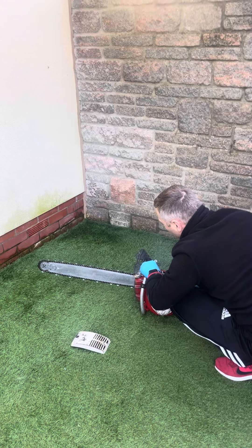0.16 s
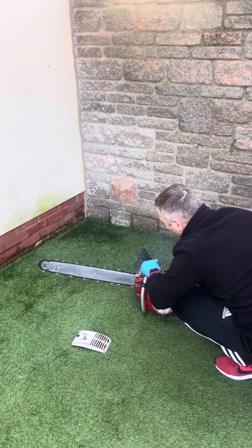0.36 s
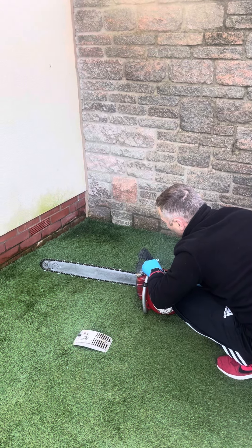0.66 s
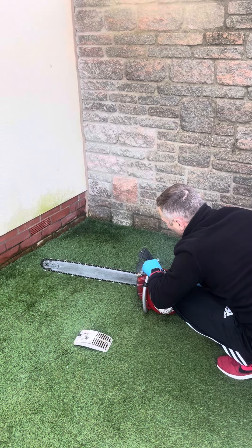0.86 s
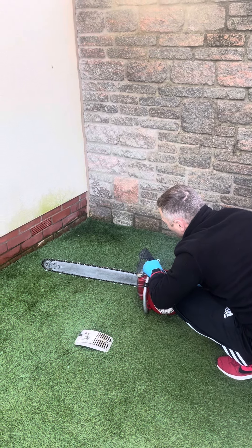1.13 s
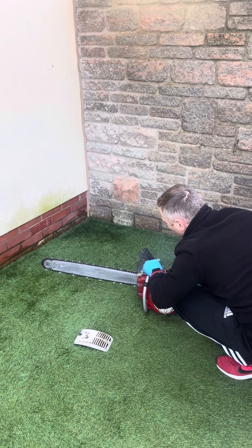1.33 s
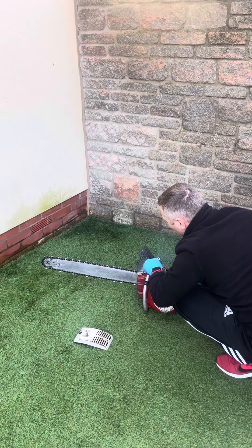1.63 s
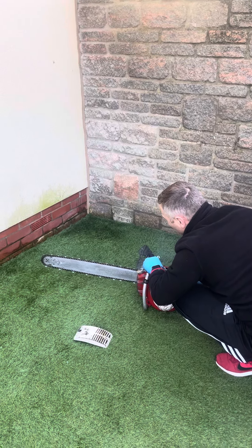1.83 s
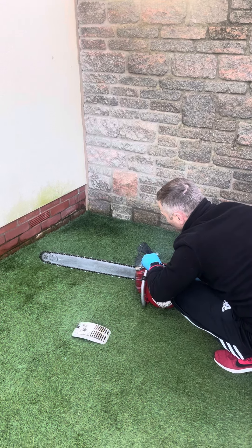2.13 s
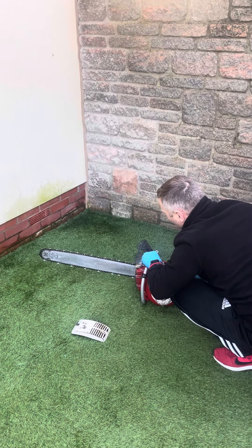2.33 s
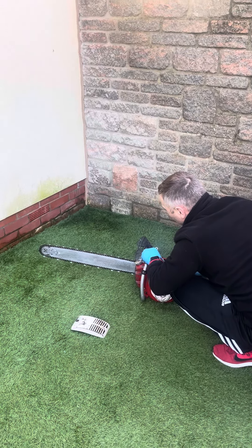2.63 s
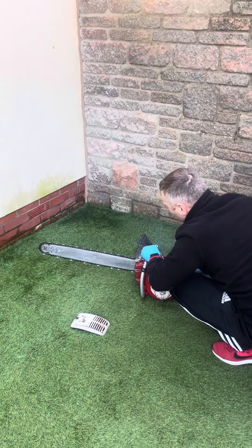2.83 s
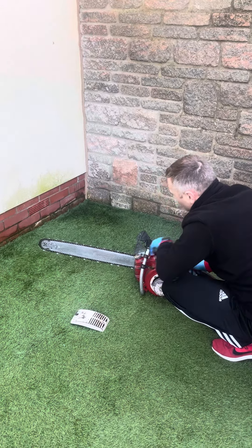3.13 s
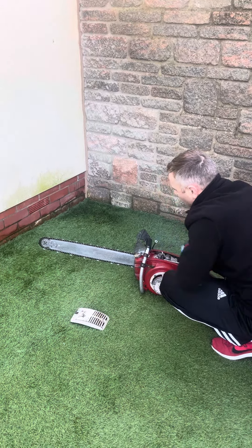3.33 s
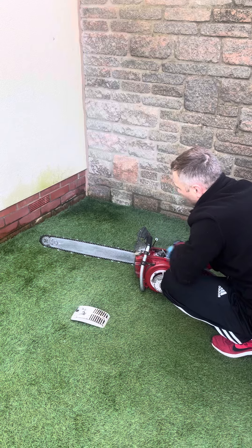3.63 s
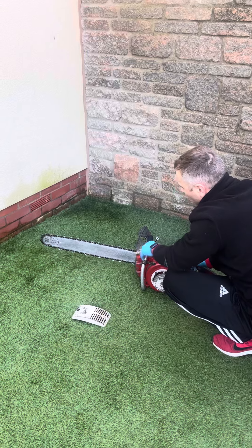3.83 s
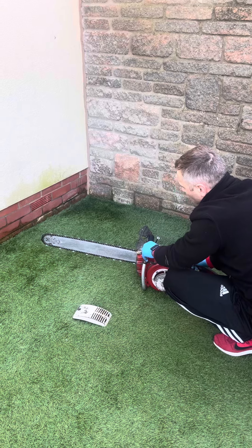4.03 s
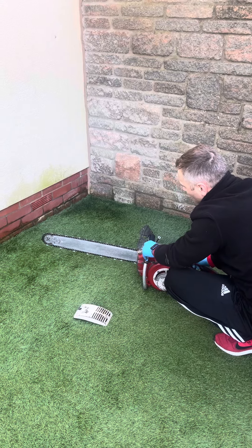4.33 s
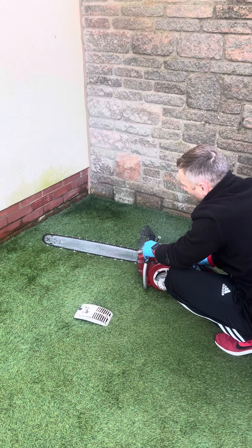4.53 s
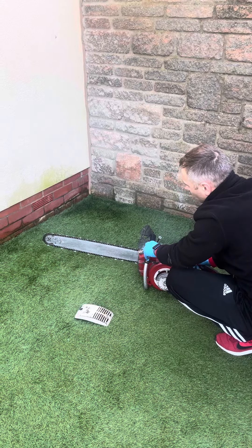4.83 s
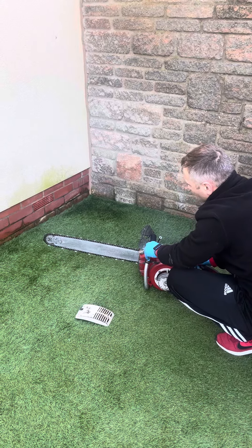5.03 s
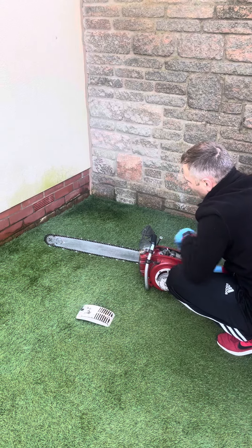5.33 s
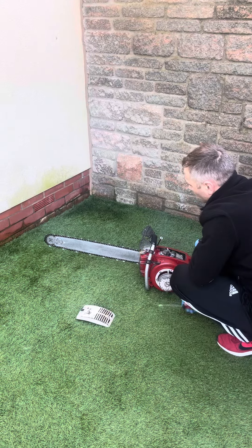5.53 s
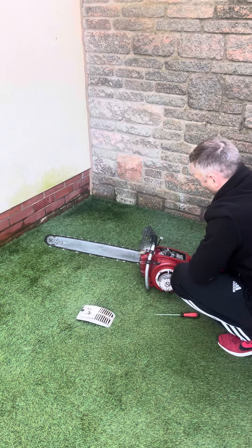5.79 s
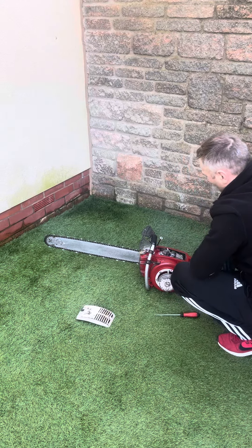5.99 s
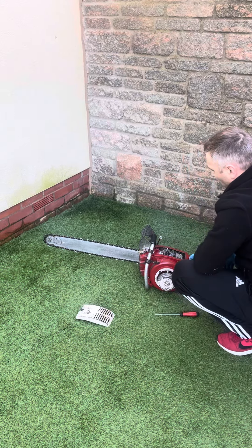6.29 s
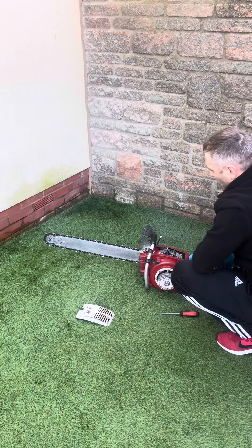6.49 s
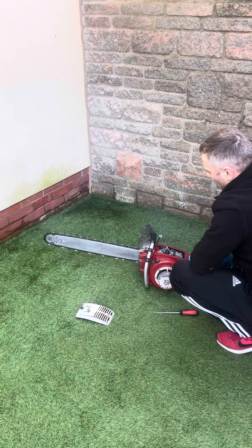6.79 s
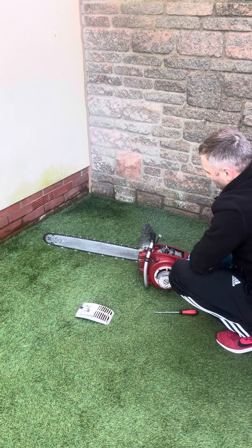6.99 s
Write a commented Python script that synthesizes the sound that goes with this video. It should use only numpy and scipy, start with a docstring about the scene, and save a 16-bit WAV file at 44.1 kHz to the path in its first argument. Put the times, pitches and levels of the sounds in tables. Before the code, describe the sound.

An old two-stroke chainsaw idles unevenly outdoors, ragged bangs popping over soft puffs and metallic rattle, then is switched off and coasts to a stop.

```python
"""Uneven bangs and soft puffs of an old two-stroke chainsaw idling on turf in a walled corner.
It fires only now and then, mostly every second to fourth turn, then is switched off and coasts to rest.
Bangs and puffs ring silencer modes, firings spit shaped gas noise, filtered gulps honk in the carburettor
and gritty noise rattles. Two phone microphones a hand apart hear it with the walls; a thin far whistle
sounds near the end, over faint yard air."""
import sys
import numpy as np
from scipy import signal
from scipy.fft import rfft, irfft, next_fast_len
from scipy.io import wavfile
from scipy.ndimage import uniform_filter1d

SR = 44100
rng = np.random.default_rng(int(sys.argv[2]) if len(sys.argv) > 2 else 0)


def store_wav(level_fs):
    """Save 16-bit WAV to argv[1]."""
    pcm = np.round(np.clip(np.atleast_2d(level_fs), -1, 1) * 32767)
    wavfile.write(sys.argv[1], SR, pcm.T.astype(np.int16))


N = 315315

# Yard air. Each row: frequency in Hz, relative level in dB per Hz.
YARD_AIR = [(30, -4), (200, -10), (700, -27.5), (1200, -31), (3300, -45), (8000, -61), (14000, -79)]
# Wall echoes that push the two ports opposite ways. Each row: delay in ms, level in dB.
WALL_ECHOES = [(3.1, -14.5), (9.6, -14), (16.5, -8.5)]
# Port phase, left against right. Each row: frequency in Hz, lead in radians.
PORT_PHASE = [(0, 0), (1290, -0.7), (2410, 1.9), (4050, 0.5), (6290, 3.5), (7670, 6.1), (10000, 9.2),
              (14500, 15.5), (16000, 16.)]
# Port balance, left against right. Each row: frequency in Hz, level difference in dB.
PORT_BALANCE = [(60, 0.0), (200, -1.0), (380, 0.0), (700, -0.5), (1290, 3.5), (2380, 0.0), (4400, -1.0),
                (8120, 0.0)]
# Piston knocking against compression as it stops. Each row: start in seconds, relative level in dB.
PISTON_KNOCKS = [(6.746, -30.5), (6.876, -36), (6.913, -34), (7.003, -38.5)]
# Faint low thuds as the piston rocks to rest. Each row: start in seconds, relative push in dB.
PISTON_ROCKS = [(6.918, -44), (6.958, -50), (7.04, -55)]
# Rattle of loose parts. Each row: frequency in Hz, relative level in dB per Hz.
RATTLE_COLOUR = [(700, 6.5), (1150, 2), (1550, -1.5), (2000, -5), (2400, -1.5), (2750, -6.5), (3600, -11),
                 (5000, -11), (8500, -17), (11500, -20.5), (13500, -33.5), (15500, -61)]
# Clutch shoe rings. Each row: frequency in Hz, nominal ring in ms, share of turns from 0 to 1,
# strongest level in dB against the rattle.
CLUTCH_RINGS = [(2460, 7, 0.52, -2), (3560, 6, .55, -8), (5200, 7, .3, -9), (8800, 8, .3, -15)]
# Carburettor throat resonances. Each row: frequency in Hz, width in Hz, relative level in dB.
INTAKE_THROAT = [(942.7, 98, 1), (1010.5, 52, 0), (538, 275, -1.5), (757, 14, -1.5), (487.8, 80, -1),
                 (210, 236, 0.5)]
# Inlet port snaps, opening then closing: level in dB against the gulp noise.
INLET_SNAP_DB = [31, 27]
# Firings. Each row: time in seconds, relative bang in dB, gas spit in dB against the bang,
# shell crack in dB against the bang.
FIRINGS = [(0.0008, -11.5, -30.5, -30), (0.0883, -12.5, -26, -43), (0.1238, -13.5, -32, -38),
           (0.1936, -3, -29, -27.5), (0.2913, -10.5, -30, -36), (0.3258, -10.5, -28.5, -29),
           (0.3931, -10, -29.5, -45), (0.4625, -3, -27.5, -33), (0.5633, -14.5, -29, -34),
           (0.6363, -8.5, -28, -27.5), (0.7089, -13, -30.7, -40), (0.7455, -11, -30, -30.9),
           (0.8215, -3.5, -29, -25), (0.9282, -2.5, -29.5, -24), (1.061, -2, -27, -26.5),
           (1.191, -5, -25.5, -33), (1.2925, -4, -26, -22), (1.3964, -5, -24, -32),
           (1.5045, -3, -28.1, -24.5), (1.607, -7, -26, -26), (1.6791, -8.5, -24.5, -36),
           (1.7524, -2.5, -29.5, -23.5), (1.8513, -9, -28, -33), (1.919, -5, -30, -23),
           (2.021, -4, -28, -23.5), (2.1228, -5, -27.5, -30), (2.192, -6.5, -25, -26),
           (2.2615, -2.7, -24, -34), (2.3595, -7, -30, -34), (2.4265, -7.5, -30, -45.5),
           (2.4956, -3.5, -30.5, -31), (2.5997, -2.5, -25, -25.5), (2.73, -4.5, -25.5, -30.5),
           (2.8306, -4, -25.5, -24), (2.9344, -3.5, -27.5, -28), (3.034, -4, -30.5, -25),
           (3.1344, -2.5, -27.5, -24), (3.233, -2, -29.5, -27), (3.3302, -6.5, -27.5, -24.5),
           (3.398, -5, -27, -28), (3.5028, -13, -28.5, -33), (3.575, -13.5, -32, -33),
           (3.6514, -7, -24.5, -26), (3.7304, -4, -28, -24.5), (3.868, -3, -28, -23.5),
           (3.9925, -3, -27.5, -26), (4.0878, -4, -28, -24.5), (4.1866, -1.5, -30, -23.5),
           (4.318, -1.5, -31.5, -24.5), (4.4446, -2.5, -25, -28.5), (4.5415, -3.5, -27.5, -25),
           (4.641, -5.5, -26.5, -23), (4.7108, -7, -27.5, -33), (4.7786, -10, -31.1, -29),
           (4.8481, -9.5, -27, -35), (4.9193, -3.5, -29, -24), (5.0229, -3, -29, -22.5),
           (5.1552, -5.5, -25.5, -28), (5.2247, -10, -31.5, -26), (5.2945, -5, -29, -27),
           (5.398, -5, -28.5, -26.5), (5.5041, -3.5, -27.5, -25.5), (5.6344, -2, -31.9, -23),
           (5.731, -7, -28.5, -30.3), (5.797, -2.5, -30.5, -25.5), (5.9253, -9, -26, -30),
           (5.9925, -5.5, -29.5, -21.5), (6.096, -3, -29.5, -25.5), (6.1932, -10, -32, -28),
           (6.2267, -6, -29, -25), (6.3284, -3, -28.5, -23), (6.429, -3, -28, -23.5)]
# Gas spit. Each row: frequency in Hz, relative level in dB per Hz.
GAS_COLOUR = [(3500, -60), (5000, -1), (8000, -2), (11000, 3.5), (13500, -3.5), (15500, -3)]
# Silencer shell crack. Each row: frequency in Hz, relative level in dB per Hz.
SHELL_COLOUR = [(800, 2.5), (1500, -3.5), (2100, -8), (3000, -11), (4500, -14), (6500, -20.5)]
# Silencer chambers. Each row: frequency in Hz, build-up in ms, ring in ms, arrival in ms, relative peak in dB.
SILENCER_MODES = [(251.5, 1.6, 13.3, 3.21, -16.3), (304.5, .82, 12.7, 2.49, -16.1),
                  (356.8, 9, 8.14, 2.07, -12.2), (437, 1.6, 26, 1.86, -27.6), (529, 8.9, 9.6, 3.06, -25.4),
                  (592.6, .54, 9.6, 3.71, -11.2), (604, 5.9, 6.5, .69, -12), (780, .35, 12, 1.83, -19.7),
                  (929.8, 9, 4, .14, -15.5), (1002.8, .35, 12.1, 3.91, -21.9), (1231, 8.2, 4.3, .63, -27),
                  (1530, 7, 3.5, 1.2, -29), (1850, 5, 2.5, 1.15, -33), (2240, 5, 2.5, 1.15, -34),
                  (2910, 5, 2.5, 3.5, -30), (3270, 5, 2.5, 2.5, -36), (1105, 5, 5, 1.5, -29),
                  (722, 5, 7, 2, -33)]
# Crankcase breathing into the corner. Each row: frequency in Hz, build-up in ms, ring in ms, arrival in ms,
# relative peak in dB for a bang, relative peak in dB for a puff.
CASE_MODES = [(57.4, 11, 4.3, 8.7, 5.5, 1.5), (84.2, 36, 9.9, 6.85, 1.5, 0),
              (145.2, 12.8, 12.5, 1.3, -9, 6.5), (171, 29, 2.75, 0.66, 5, 4.5)]

YARD_DB = -59.5
WHISTLE_HZ, WHISTLE_S, WHISTLE_EDGE_S = 3540, 6.85, 0.013
WHISTLE_DB, WHISTLE_FADE_DB_PER_S = -56.5, 42
TOP_HZ = 15700  # top of the microphone's range
SPREAD_DB = -5  # share of jet and rattle that each port hears on its own

TURN_S = .0345  # typical idle turn
PORT_OPENS_S = 0.002484  # the exhaust port opens this long before the bang is heard to rise
# without spark, friction slows the crank at a steady rate
COAST_S, COAST_TURNS_PER_S, SLOWING_TURNS_PER_S2 = 6.5538, 29.6, 49.5
COAST_PUFF_DB, COAST_FADE_DB_PER_TURN = -12, 0.93
COAST_THUMP_DB, COAST_THUMP_DB_PER_TURN = -4.5, -0.2
COAST_DEEP_DB, COAST_DEEP_HZ, COAST_DEEP_LATE_S = -41.5, 100, 0.0039  # slow turns add a deep push

RATTLE_DB, INTAKE_DB = -37.5, -32  # at idle
RATTLE_DB_PER_HALVING, INTAKE_DB_PER_HALVING = 10, 10.5  # drop each time the crank speed halves
CLUSTER_DB, CLUSTERS_PER_S = 2.5, 25  # the rattle swells in clusters, each band on its own

PUFF_DB, PUFF_SOFT_HZ, PUFF_SCATTER_DB = -13, 1060, 1.7
PUFF_BARK_HZ, PUFF_BARK_DB = 538, -21  # puffs carry extra bark around here
PUFF_HOLLOW_HZ, PUFF_HOLLOW = 352, 0.27  # and ring the main chamber less, by this share
THUMP_DB, PUFF_THUMP_DB, PUFF_THUMP_ABOVE_HZ = -30.5, -33, 153
COLOUR_SCATTER_DB, COLOUR_ABOVE_HZ = 3.5, 1050  # upper chambers ring differently at each bang, mostly less


def undb(db):
    """Amplitude factor for a level in dB."""
    return 10 ** (np.asarray(db) / 20)


def level(x, db):
    """Scales x to an RMS level in dB."""
    return x * undb(db) / np.sqrt(np.mean(x ** 2))


def shape(x, gain):
    """Multiplies the spectrum by gain(Hz)."""
    size = next_fast_len(N)
    hz = np.arange(size // 2 + 1) * SR / size + 1  # 1 Hz up, to avoid dividing by zero
    return irfft(rfft(x, size) * gain(hz), size)[..., :N]


def colour(x, rows):
    """Shapes the spectrum along table rows of Hz and dB."""
    hz, db = np.transpose(rows)
    return shape(x, lambda f: undb(np.interp(np.log(f), np.log(hz), db, left=-80)))


def through(x, response):
    """Convolves x with a response."""
    return signal.fftconvolve(x, response)[:N]


def pulses(s, db):
    """One single-sample click per event."""
    out = np.zeros(N)
    places = np.clip((np.asarray(s) * SR).astype(int), 0, N - 1)
    np.add.at(out, places, undb(db))
    return out


def chambers(modes):
    """Response of coupled chambers: each mode builds up, then rings away."""
    out = 0
    for k, (hz, rise_ms, ring_ms, late_ms, db) in enumerate(modes):
        ms = np.maximum(np.arange(SR // 5) * 1000 / SR - late_ms, 0)
        swell = (1 - np.exp(-ms / rise_ms)) ** 2 * np.exp(-ms / ring_ms)
        tone = np.sin(2 * np.pi * hz * ms / 1000)
        out = out + (-1) ** k * undb(db) * swell / swell.max() * tone  # neighbours in opposite sign
    return out


def grit(spread_db):
    """Noise made of tiny knocks of very uneven size."""
    unevenness = uniform_filter1d(rng.exponential(size=N), size=24)
    return rng.standard_normal(N) * undb(spread_db * unevenness)


def wandering(rate):
    """Random levels, one every 1 / rate s, slewed from each to the next."""
    k = int(SR / rate)
    steps = np.repeat(rng.standard_normal(N // k + 1), k)
    return 0.9 * uniform_filter1d(steps, k)[:N]


def yard_air():
    """Quiet air of the yard: steady noise, strongest in the bass."""
    return level(colour(rng.standard_normal(N), YARD_AIR), YARD_DB)


def whistle():
    """A thin far tone of steady pitch that starts quickly and fades."""
    t = np.arange(N) / SR
    edge = np.clip((t - WHISTLE_S) / WHISTLE_EDGE_S, 0, 1)
    fade_db = WHISTLE_DB - WHISTLE_FADE_DB_PER_S * (t - WHISTLE_S)
    return np.sqrt(2) * edge * undb(fade_db) * np.sin(2 * np.pi * WHISTLE_HZ * t)


def walls(x, wet_db, t60_s=0.084, top_hz=3540.0):
    """Diffuse return from the stone walls, unlike at the two ports; the open yard lets the bass escape."""
    t = np.arange(SR // 2) / SR
    decay = np.exp(-np.log(1000) * t / t60_s) * (t > .004)
    tails = rng.standard_normal((2, len(t))) * decay
    wet = np.array([through(x, tail / np.sqrt(np.sum(tail ** 2))) for tail in tails])

    def wall_gain(f):
        soft_top = undb(wet_db) / (1 + 1j * f / top_hz) ** 2
        return soft_top * (0.0087 + 1 / (1 + 150.0 / (1j * f)) ** 2)
    return shape(wet, wall_gain)


def wall_echoes(x):
    """Separate wall returns of x, thinned in bass and treble."""
    ms, db = np.transpose(WALL_ECHOES)
    returns = through(x, pulses(ms / 1000, db)[:SR // 20])
    return shape(returns, lambda f: 1 / (1 + 1270.0 / (1j * f)) / (1 + 1j * f / 2100.0))


def coast():
    """Times and puff levels of the last eight turns, each longer than the one before."""
    turn = np.arange(8)
    speed = np.sqrt(np.maximum(COAST_TURNS_PER_S ** 2 - 2 * SLOWING_TURNS_PER_S2 * turn, 0))
    times = COAST_S + (COAST_TURNS_PER_S - speed) / SLOWING_TURNS_PER_S2
    return times, COAST_PUFF_DB - COAST_FADE_DB_PER_TURN * turn


def halvings():
    """How many times the crank speed has halved since the coast began."""
    lost = SLOWING_TURNS_PER_S2 * (np.arange(N) / SR - COAST_S) / COAST_TURNS_PER_S
    return -np.log2(np.clip(1 - lost, .03, 1))


def crank():
    """Times of unfired idle turns, the puff strength left by the last firing, and times of all turns."""
    s, db = np.transpose(list(FIRINGS) + [(COAST_S, 0, 0, 0)])[:2]
    idle, after_db = [], []
    for start, gap, bang_db in zip(s, np.diff(s), db):
        turns = max(round(gap / TURN_S), 1)
        u = np.arange(1, turns) / turns
        # the bang speeds the crank up, so early turns are the shortest
        idle += list(start + gap * (u - 0.094 * u * (1 - u)))
        # leftover burnt gas makes the first puff after a bang the strongest
        first_db = 2.8 * (u < 1.5 / turns)
        after_db += list(0.39 * bang_db + first_db - 0.37 * np.arange(turns - 1))
    turns = np.sort(np.r_[s[:-1], idle, coast()[0], 7.0])
    return np.array(idle), np.array(after_db), turns


def piston_knocks():
    """Dull metal knocks with a short rasp."""
    s, db = np.transpose(PISTON_KNOCKS)
    u = np.arange(SR // 10) / SR / 0.0048
    rasp = through(pulses(s - .002, db), u * np.exp(1 - u)) * rng.standard_normal(N)
    dull = [(300, 2.5), (1500, 5.0), (4000, -3.0), (9000, -14), (15000, -26)]  # Hz, dB
    return colour(rasp, dull) * undb(1.0)


def rattle_fade():
    """Rattle gain, falling as the crank slows."""
    return undb(RATTLE_DB - RATTLE_DB_PER_HALVING * halvings())


def rattle(turns, phase):
    """Loose parts chatter twice a turn in uneven clusters, and clutch shoes ring briefly."""
    beat = 1 + 0.067 * np.cos(4 * np.pi * (phase - .2))
    chatter = level(colour(grit(8.4) * beat, RATTLE_COLOUR), 0)
    clustered = 0
    for k in range(11):  # overlapping bands, half an octave apart
        band = shape(chatter, lambda f: np.clip(1 - abs(np.log2(f / 496.0) * 2 - k), 0, 1))
        clustered = clustered + band * undb(CLUSTER_DB * wandering(CLUSTERS_PER_S))
    for hz, ring_ms, share, db in CLUTCH_RINGS:
        luck, place, size = rng.random((len(turns), 3)).T
        taps = pulses(turns + TURN_S * place, np.where(luck < share, -8 * size, -200))
        ring = chambers([(hz, 2 * ring_ms, .9 * ring_ms, 0, db)])
        clustered = clustered + through(taps, ring)
    return clustered * rattle_fade()


def intake(turns, phase):
    """Intake gulps twice a turn through the resonant carburettor throat, with the inlet port snapping."""
    gulp = 0.88 + np.exp(-((phase - .52) / 0.061) ** 2) + 0.81 * np.exp(-((phase - .85) / 0.052) ** 2)
    # the inlet port snaps open and shut once a turn
    size, late = rng.standard_normal((len(turns) - 1, 2, 2)).T
    snap_phase = np.array([[.43], [.8]]) + 0.013 * late
    snap_s = turns[:-1] + np.diff(turns) * snap_phase
    snap_db = np.c_[INLET_SNAP_DB] + 3.0 * size
    snaps = pulses(snap_s.ravel(), snap_db.ravel())

    def throat(f):
        return sum(undb(db) / (1 + 1j * (f / hz - hz / f) * hz / width) ** 2
                   for hz, width, db in INTAKE_THROAT)
    honk = level(shape(snaps + gulp * rng.standard_normal(N), throat), 0)
    return honk * undb(INTAKE_DB - INTAKE_DB_PER_HALVING * halvings())


def engine_noise(turns):
    """Carburettor honk and rattle, both following the crank's place within each turn."""
    phase = np.interp(np.arange(N) / SR, turns, np.arange(len(turns))) % 1
    return intake(turns, phase) + rattle(turns, phase)


def gas_spit(idle):
    """Hot gas jets out in two quick gusts at each bang and hisses away; the silencer shell cracks with it."""
    s, db, gas_db, shell_db = np.transpose(FIRINGS)
    ms = np.arange(SR // 5) * 1000 / SR
    gusts = np.exp(-((ms - 6.7) / 1.26) ** 2) + 0.13 * np.exp(-((ms - 10.6) / 1.6) ** 2)
    hiss = (1 - np.exp(-(ms / 3.45) ** 2)) * (.5 * np.exp(-ms / 10.) + 0.2 * np.exp(-ms / 21.0))
    # unfired puffs let out only a wisp
    jet_db = np.r_[db + gas_db, np.full(len(idle), -56.)]
    jets = pulses(np.r_[s, idle] - PORT_OPENS_S, jet_db)
    gas = through(jets, gusts + hiss) * level(colour(grit(10.2), GAS_COLOUR), 7.2)
    crack = ms / 6.2 * np.exp(1 - ms / 9.02)
    cracks = through(pulses(s - PORT_OPENS_S, db + shell_db), 0.5 * crack ** 2 + 0.25 * gusts)
    return gas + cracks * level(colour(grit(5.1), SHELL_COLOUR), -1.0)


def puff_tone(f):
    """Spectrum of an unfired puff: soft on top, barking, hollow at the main chamber."""
    bark = undb(PUFF_BARK_DB) * np.exp(-(np.log(f / PUFF_BARK_HZ) / 0.2) ** 2)
    hollow = PUFF_HOLLOW * np.exp(-(np.log(f / PUFF_HOLLOW_HZ) / 0.049) ** 2)
    return (1 + bark - hollow) / (1 + 1j * f / PUFF_SOFT_HZ) ** 2


def exhaust(idle, after_db):
    """Sharp bangs and soft unfired puffs ring the silencer; every turn thumps the case."""
    s, db = np.transpose(FIRINGS)[:2]
    bang_s = s - PORT_OPENS_S
    coast_s, coast_db = coast()
    coast_turn = np.arange(len(coast_s))
    rock_s, rock_db = np.transpose(PISTON_ROCKS)
    late, puff_size, thump_size = rng.standard_normal((len(idle), 3)).T

    bangs = pulses(bang_s, db)
    puff_s = np.r_[idle + .0004 * late, coast_s] - PORT_OPENS_S
    puff_db = np.r_[PUFF_DB + after_db + PUFF_SCATTER_DB * puff_size, coast_db]
    # with nothing burnt, the opening port draws gas back in, so a puff swings the other way
    puffs = -shape(pulses(puff_s, puff_db), puff_tone)
    # uneven burning adds a ragged crackle, so no two bangs ring alike
    burning = through(bangs, np.exp(-np.arange(SR // 20) / SR / 0.0032))
    crackle = undb(-38.0) * burning * rng.standard_normal(N)
    silencer = through(bangs + puffs + crackle, chambers(SILENCER_MODES))
    for k, tint in enumerate(rng.standard_normal((len(s), len(SILENCER_MODES))).T):
        if SILENCER_MODES[k][0] > COLOUR_ABOVE_HZ:
            change = pulses(bang_s, db + COLOUR_SCATTER_DB * (tint - .8)) - bangs
            silencer = silencer + (-1) ** k * through(change, chambers(SILENCER_MODES[k:k + 1]))
    silencer = silencer * undb(2.5)

    idle_thump_db = .6 * after_db + 1.5 * thump_size
    coast_thump_db = COAST_THUMP_DB + COAST_THUMP_DB_PER_TURN * coast_turn
    thumps = pulses(puff_s, PUFF_THUMP_DB + np.r_[idle_thump_db, coast_thump_db])
    light = shape(thumps, lambda f: 1 / (1 + PUFF_THUMP_ABOVE_HZ / (1j * f)))
    deep_s = np.r_[coast_s + COAST_DEEP_LATE_S, rock_s]
    deep = pulses(deep_s, np.r_[COAST_DEEP_DB + 1.2 * coast_turn, rock_db])
    light = light + shape(deep, lambda f: 1 / (1 + (f / COAST_DEEP_HZ) ** 4))

    bang_case = chambers(np.delete(CASE_MODES, 5, axis=1))  # without the puff column
    puff_case = chambers(np.delete(CASE_MODES, 4, axis=1))  # without the bang column
    heavy = through(pulses(bang_s, 0.69 * db + THUMP_DB), bang_case)
    # the strongest swing of each bang is a drop in pressure
    return -silencer + heavy - through(light, puff_case)


def scene():
    """Places the saw before the two ports, with wall returns, far whistle and yard air."""
    idle, after_db, turns = crank()
    works = engine_noise(turns)
    pipe = exhaust(idle, after_db)
    sharp = gas_spit(idle) + piston_knocks()
    side = np.array([[.5], [-.5]])  # left, right: half of each port difference

    def ports(f):
        lead = np.exp(1j * side * np.interp(f, *np.transpose(PORT_PHASE)))
        return lead * undb(side * np.interp(f, *np.transpose(PORT_BALANCE)))
    direct = shape(pipe + sharp + works, ports)

    # jet and works are wide sources, so each port also gets a middle band of its own
    own = np.array([gas_spit(idle) + level(colour(grit(15.0), RATTLE_COLOUR), 0) * rattle_fade()
                    for _ in side])
    own = shape(own, lambda f: undb(SPREAD_DB) / (1 + (1700. / f) ** 4) / (1 + (f / 4800.) ** 6))

    echoes = 2 * side * wall_echoes(pipe + works)
    room = walls(pipe, wet_db=-11.0) + walls(sharp + works, wet_db=-10.5, top_hz=5900.0)
    room = room + walls(works, wet_db=-27.0, t60_s=0.091)
    return direct + echoes + own + room + whistle() + yard_air()


def record(dry):
    """The phone thins the deepest bass, rounds the loudest peaks and cuts the top."""
    bass_cut = signal.butter(3, 42., btype="highpass", fs=SR, output="sos")
    thin = signal.sosfilt(bass_cut, dry)
    rounded = np.tanh(0.69 * thin) / 0.68
    top_cut = signal.ellip(8, .2, 90, TOP_HZ, fs=SR, output="sos")
    return signal.sosfilt(top_cut, rounded)


dry = scene()
out = record(dry)
store_wav(out)
```